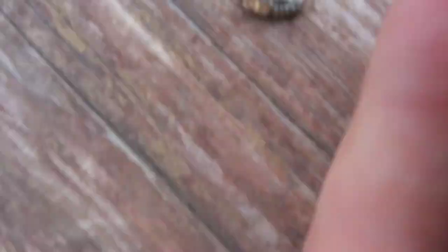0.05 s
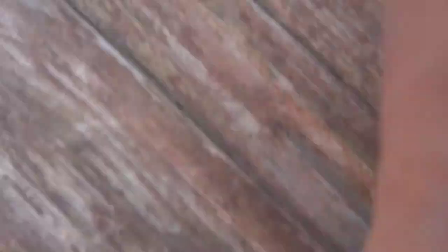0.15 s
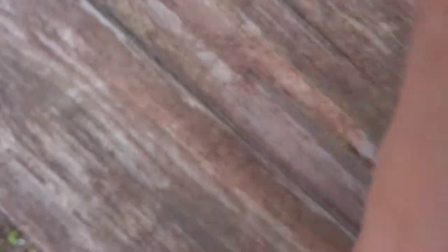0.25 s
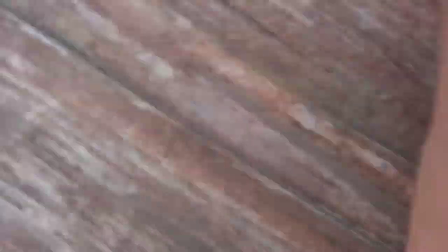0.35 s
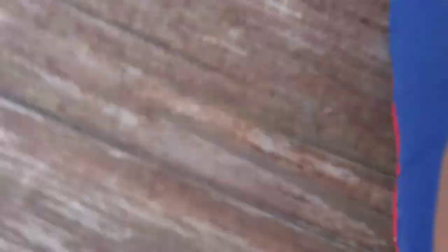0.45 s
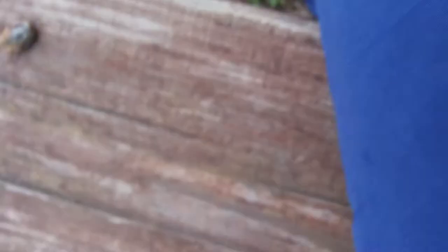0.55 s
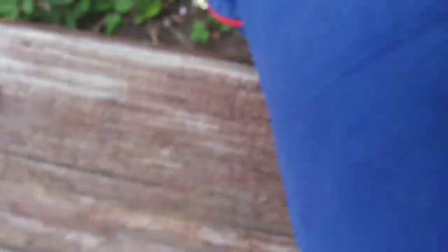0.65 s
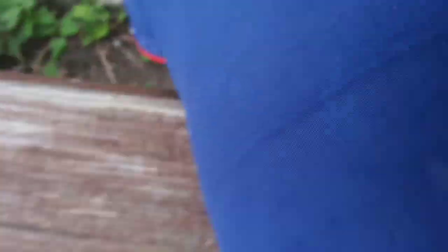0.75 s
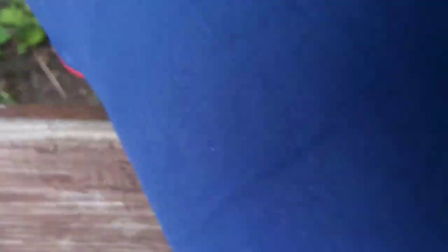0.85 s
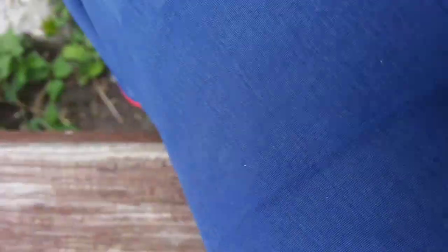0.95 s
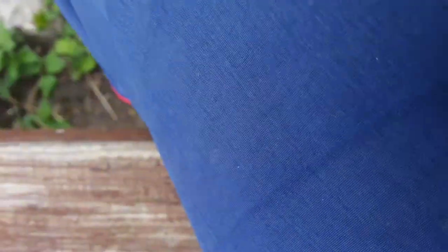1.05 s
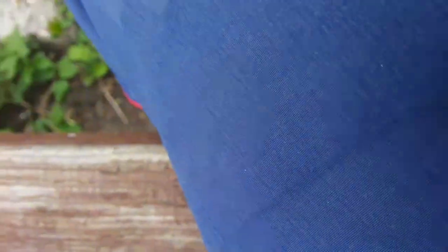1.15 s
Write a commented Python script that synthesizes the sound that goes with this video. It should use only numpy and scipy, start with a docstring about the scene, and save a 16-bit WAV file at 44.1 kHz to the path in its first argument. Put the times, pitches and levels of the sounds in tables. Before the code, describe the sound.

Close camera handling noise sounds over a quiet outdoor hush. Light fingernail ticks begin around 0.1 seconds. From 0.2 to 0.5 seconds, fingers bump the hollow case in a quick flurry, with a sharp click near 0.3 and the hardest knock at 0.4. Skin and cloth rub from 0.3 until about 1 second, with another strong knock at 0.7. Near 1.2 seconds come a small tap and a tiny fingertip squeak.

```python
"""A quiet outdoor hush, then close rubbing as skin and cloth slide over a handheld camera.
Fingernails tick on the case and fingers bump it, ringing its hollow modes; the hardest hits overload
into a fast limiter. Shoves of the hand add a faint rumble, and last a fingertip slips with one chirp."""
import sys
import numpy as np
from scipy import signal
from scipy.fft import rfft, irfft
from scipy.io import wavfile
from scipy.ndimage import uniform_filter1d, minimum_filter1d

SR = 44100
rng = np.random.default_rng(int(sys.argv[2]) if len(sys.argv) > 2 else 0)


def bounce(signal):
    """Save signal as a 16-bit WAV file at the path given by the first command-line argument."""
    frames = np.transpose(np.atleast_2d(signal))
    limited = np.clip(frames, -1, 1)
    pcm = np.round(limited * 32767).astype(np.int16)
    wavfile.write(sys.argv[1], SR, pcm)


N = 57330  # 1.3 s


def undb(db):
    """Decibels to gain."""
    return 10 ** (np.asarray(db) / 20)


def curve(points):
    """Gain envelope from (time [s], level [dB]) points."""
    return undb(np.interp(np.arange(N) / SR, *np.array(points).T))


def noise(spectrum):
    """Unit-rms noise shaped by (frequency [Hz], level [dB]) points."""
    hz, db = np.array(spectrum).T
    gain = undb(np.interp(np.log(np.fft.rfftfreq(N, 1 / SR) + 1), np.log(hz), db))
    shaped = irfft(rfft(rng.standard_normal(N)) * gain, N)
    return shaped / shaped.std()


def fade(t60_s):
    """Exponential decay from time zero."""
    return np.exp(-np.log(1000) * np.arange(N) / SR / t60_s)


def ring(hz, t60_s):
    """One struck mode."""
    return np.cos(2 * np.pi * hz * np.arange(N) / SR) * fade(t60_s)


def at(sound, start_s):
    """Delay a sound to its start time."""
    return np.concatenate([np.zeros(int(start_s * SR)), sound])[:N]


# Outdoor air spectrum (frequency [Hz], relative level [dB])
HUSH_SPECTRUM = [(25, -51), (60, -16.5), (110, -8), (170, -8.5), (250, -2), (400, -8.5), (700, -12),
                 (1100, -8.5), (1500, -16), (2000, -25.5), (2700, -31), (8000, -34), (16000, -34.5)]


def hush(level_db=-46):
    """Outdoor air: steady, dark noise."""
    return undb(level_db) * noise(HUSH_SPECTRUM)


# Rub envelope (time [s], level [dB])
RUB_ENVELOPE = [(0, -73), (.12, -54.5), (.17, -46), (.27, -62), (.32, -32), (.345, -43.5), (.37, -30),
                (.405, -20.5), (.42, -37), (.475, -32), (.5, -34.5), (.58, -33.5), (.63, -42), (.69, -68),
                (.712, -66), (.728, -35.5), (.765, -30), (.79, -41), (.82, -31), (.86, -42), (.885, -58),
                (.915, -37), (.945, -38), (.98, -64), (1.3, -62)]
# Rub spectrum (frequency [Hz], relative level [dB])
RUB_SPECTRUM = [(40, -24), (150, -0.5), (240, -1.5), (700, -3), (1140, -1.5), (1700, -3), (3200, -10.5),
                (4300, -18), (5800, -21), (8500, -32.5), (16000, -26.5)]
# Treble friction hiss envelope (time [s], level [dB])
HISS_ENVELOPE = [(0, -80), (.12, -68), (.15, -47), (.21, -57), (.27, -63), (.32, -47), (.345, -42.5),
                 (.375, -33.5), (.405, -39), (.42, -58), (.49, -50.5), (.54, -41), (.585, -42), (.63, -61),
                 (.69, -73), (.75, -53), (.82, -60), (.88, -64), (.93, -64), (1.0, -83), (1.3, -76)]
# Treble friction hiss spectrum (frequency [Hz], relative level [dB])
HISS_SPECTRUM = [(1000, -33), (4000, -2), (5700, 6.5), (8300, -8.5), (10500, 1.5), (13000, -6), (15000, 12),
                 (16000, -7)]


def rubbing(catch_rate_hz=500, catch_depth_db=2):
    """Skin and cloth slide over the case in tiny uneven catches."""
    grain = np.interp(np.arange(N) / SR * catch_rate_hz, np.arange(N), rng.standard_normal(N))
    catches = undb(catch_depth_db * grain)
    catches /= np.sqrt(np.mean(catches ** 2))
    rub = curve(RUB_ENVELOPE) * noise(RUB_SPECTRUM)
    hiss = curve(HISS_ENVELOPE) * noise(HISS_SPECTRUM)
    return catches * (rub + hiss)


# Nail contacts (time [s], relative level [dB])
NAIL_HITS = [(.1312, -37), (0.1361, -20.5), (.1450, -33), (.1472, -37), (0.152, -33), (0.1657, -26),
             (0.178, -38), (.1882, -44), (0.209, -28), (.2845, 6.5), (.3085, -28), (.3675, -12),
             (0.398, -29)]
# Modes rung by a nail (frequency [Hz], relative level [dB], t60 [s])
NAIL_MODES = [(880, -9, .008), (2450, -3, 0.0095), (3110, -3, 0.0075), (4770, -2.5, 0.0036),
              (5960, -2, 0.0035), (9960, -2, 0.0049), (11220, 5.5, 0.0034), (12000, -2.5, 0.0054),
              (14300, 15, 0.0015)]


def nail_ticks(rise_s=0.00039, grit=0.3):
    """A nail catches on the case: short, bright, gritty clicks."""
    rise = 1 - np.exp(-np.arange(N) / SR / rise_s)
    click = rise * sum(undb(db) * ring(hz, t60_s) for hz, db, t60_s in NAIL_MODES)
    return sum(at(undb(db) / 2 * click * (1 + grit * rng.standard_normal(N)), start_s)
               for start_s, db in NAIL_HITS)


# Finger bumps (time [s], upper-mode drive [dB], contact cutoff [Hz], thump drive [dB],
# relative crack level [dB], rebound delay [s], bass lag [s], mode tuning [ratio])
FINGER_HITS = [(0.1373, -30, 1210, -34, -43, .0011, 0.0021, 1.1),
               (0.2263, -7.5, 970, -31, -29, 0.00087, 0.0024, 0.98),
               (0.2798, -19.5, 1150, -24, -47, 0.0013, 0.00081, 0.92),
               (0.2865, -13.5, 710, -12, -26, 0.0013, .001, 1.02),
               (.2888, -4.5, 790, -14, -27, 0.00155, 0.00042, 1.07),
               (0.2981, -5, 800, -16.5, -37, .0027, 0.00054, 0.898),
               (0.3083, -18, 500, -22.5, -34, 0.0032, 0.00037, 1.24),
               (0.3157, -18.5, 2000, -12, -19, 0.00132, 0.00095, 1.098),
               (0.329, -25, 500, -24.5, -44, 0.0019, 0.00092, 1.23),
               (.3550, -25, 2000, -34, -36, 0.00112, 0.00025, 0.88),
               (0.3667, -14, 2000, -29, -19, 0.00056, 0.00032, 1.04),
               (0.3758, -12.5, 2880, -12.5, -7, 0.000597, 0.00059, 1.016),
               (.3810, -3.5, 1220, -18, -15, 0.001246, 0.00112, 1.013),
               (0.3894, -6.5, 1060, -16, -37, 0.00122, 0.00086, 0.974),
               (0.3957, -20, 880, -11.5, -36, 0.0019, 0.0011, 0.94),
               (0.3991, -12, 1390, -30, -32, 0.00089, 0.00102, 0.99),
               (0.4026, -10, 2560, -32, -9.5, 0.001733, 0.00059, 1.007),
               (0.4085, 2.5, 1590, -2.5, -14, 0.00071, 0.00313, 1.033),
               (0.4325, -20, 550, -14.5, -38, 0.0015, 0.0009, 1.13),
               (0.4365, -10.5, 980, -12, -32, 0.00106, 0.00057, 1.15),
               (0.4517, -21.5, 1310, -17, -48, .0021, 0.0019, 1),
               (0.47, -25, 443, -12, -48, 0.0013, 0.0013, 0.93),
               (0.4759, -23.5, 2250, -26, -27.5, 0.0066, 0.00054, 1.11),
               (0.7349, -1, 1480, -2, -16, 0.0023, 0.00299, 0.95),
               (0.8521, -34, 400, -24, -58, 0.0026, 0.0021, 1.16),
               (0.8927, -35, 293, -18, -60, .002, .001, 1.02),
               (.9050, -28, 1720, -23, -50, 0.0012, 0.00079, 0.97),
               (1.1571, -20, 1880, -29, -20.5, 0.0034, 0.0008, 0.96)]
# Case modes (frequency [Hz], relative level [dB], t60 [s])
CASE_MODES = [(150, -21, 0.061), (242.5, -1, 0.069), (288, -7.5, 0.029), (365.6, -7, 0.046),
              (491, -2.5, 0.02), (666, -13, 0.026), (754, -12, 0.023), (984, -3, 0.012), (1087, -11, 0.019),
              (1456, -6, 0.013), (1943, -4, 0.0068), (2410, -12.5, 0.012), (3125, -4.5, 0.0079),
              (5700, -1.5, 0.0074)]
# Hard-contact crack spectrum (frequency [Hz], relative level [dB])
CRACK_SPECTRUM = [(200, -20), (1500, -23), (3200, -3.5), (4200, 9.5), (6000, 11.5), (8300, -9), (11000, 5),
                  (16000, -31)]


def finger_knocks(thump_below_hz=400, low_cut_hz=117, lag_corner_hz=676, rebound_db=-3.5):
    """Bumps ring the case, tuned by the grip, and rebound once; soft ones are dull, hard ones crack."""
    fft_samples = 8192
    f = np.fft.rfftfreq(fft_samples, 1 / SR)
    s = 2j * np.pi * f
    low_cut = (1j * f / (low_cut_hz + 1j * f)) ** 2
    out = np.zeros(N)
    for start_s, upper_db, contact_hz, thump_db, crack_db, rebound_s, lag_s, tuning in FINGER_HITS:
        contact_lowpass = 1 / (1 - (f / contact_hz) ** 2 + 1j * f / contact_hz)
        rebound = 1 + undb(rebound_db) * np.exp(-s * rebound_s)
        bass_lag = np.exp(-2j * np.pi * lag_s * lag_corner_hz * np.arctan(f / lag_corner_hz))
        case = 0
        for hz, mode_db, t60_s in CASE_MODES:
            damped = s + np.log(1000) / t60_s
            mode = SR * damped / (damped ** 2 + (2 * np.pi * hz * tuning) ** 2)  # decaying cosine
            drive = undb(thump_db) if hz < thump_below_hz else undb(upper_db) * rebound
            case += drive * undb(mode_db) * mode
        knock = np.pad(irfft(case * contact_lowpass * bass_lag * low_cut), (0, N - fft_samples))
        crack = undb(crack_db) / 2 * noise(CRACK_SPECTRUM) * fade(t60_s=0.0083)
        out += at(knock + crack, start_s)
    return out


# Pushes on the camera (time [s], frequency [Hz], level [dB])
HAND_PUSHES = [(0.284, 85, -37), (0.367, 42, -31), (.383, 45, -34), (0.403, 45, -27), (0.734, 60, -24),
               (.891, 101, -28), (1.159, 70, -40)]


def hand_shoves(rise_s=0.0032, t60_s=0.053):
    """The hand rocks the whole camera: brief, faint rumbles."""
    rise = 1 - np.exp(-np.arange(N) / SR / rise_s)
    return sum(at(undb(db) * rise * ring(hz, t60_s), start_s) for start_s, hz, db in HAND_PUSHES)


def fingertip_slip(start_s=1.2074, level_db=-25, start_hz=2320, fall_per_s=330, rise_s=0.00066):
    """A few slowing stick-slip cycles: one falling chirp."""
    t = np.arange(N) / SR
    phase = 2 * np.pi * np.cumsum(start_hz * np.exp(-fall_per_s * t)) / SR
    swell = (t / rise_s * np.exp(1 - t / rise_s)) ** 2
    return at(undb(level_db) * swell * np.sin(phase), start_s)


def scene():
    """Handling sounds over the hush, mono."""
    return (hush() + rubbing() + nail_ticks() + finger_knocks() + hand_shoves() + fingertip_slip())[None]


def record(dry):
    """Fast peak limiter, then a steep low-pass."""
    ceiling, window_s, cutoff_hz = 0.82, 0.00033, 16000
    window_samples = int(window_s * SR) | 1
    gain = ceiling / np.maximum(np.abs(dry), ceiling)
    gain = uniform_filter1d(minimum_filter1d(gain, window_samples), window_samples)
    lowpass = signal.ellip(10, .2, 80, cutoff_hz, fs=SR, output="sos")
    return signal.sosfilt(lowpass, dry * gain)


dry = scene()
out = record(dry)
bounce(out)
```